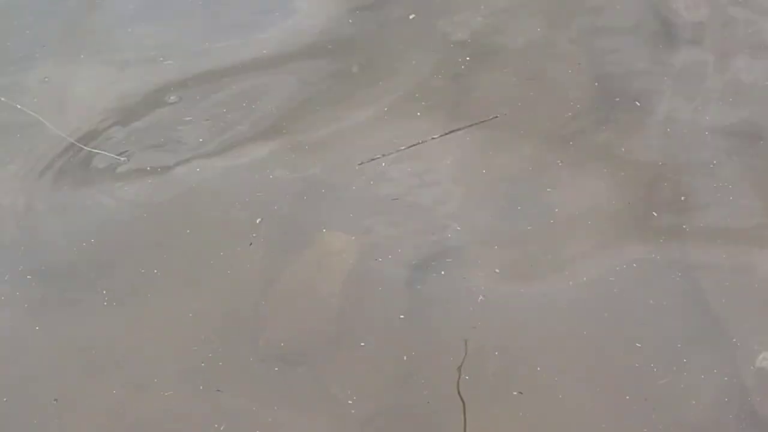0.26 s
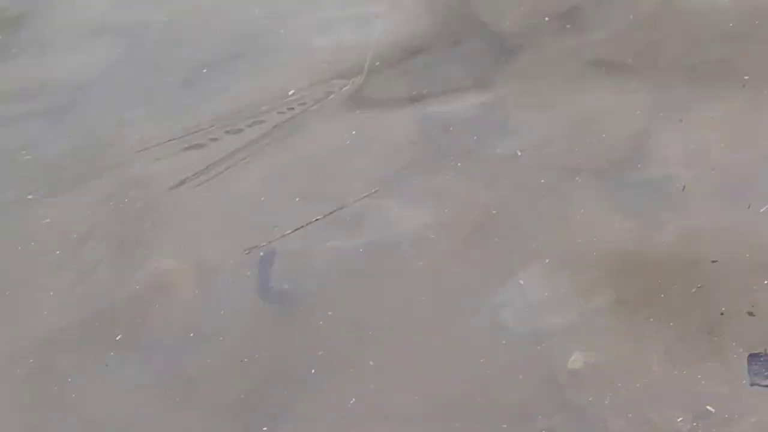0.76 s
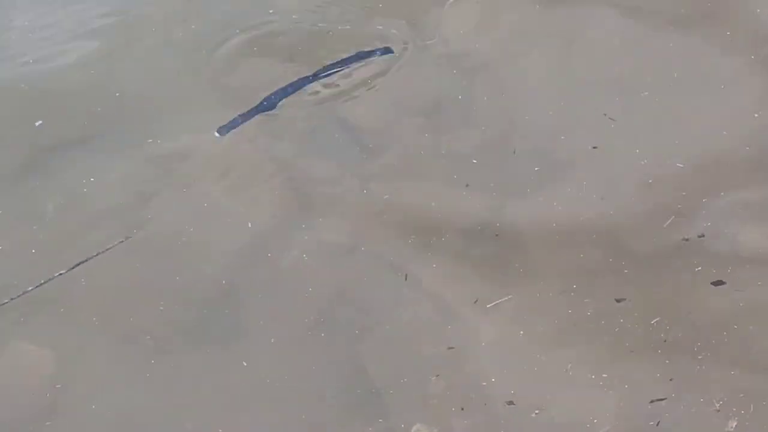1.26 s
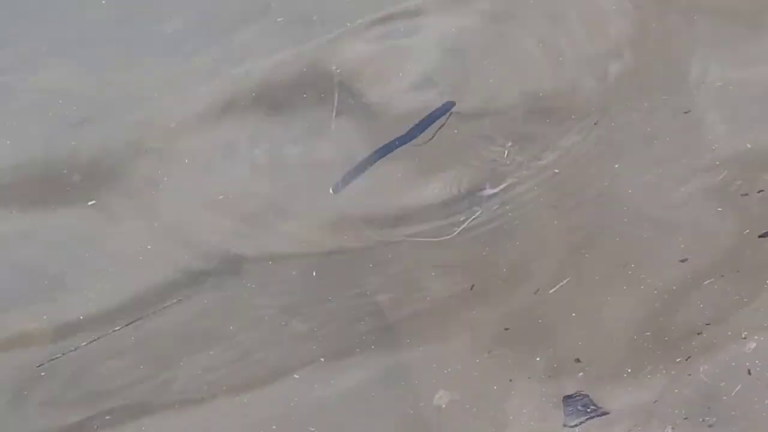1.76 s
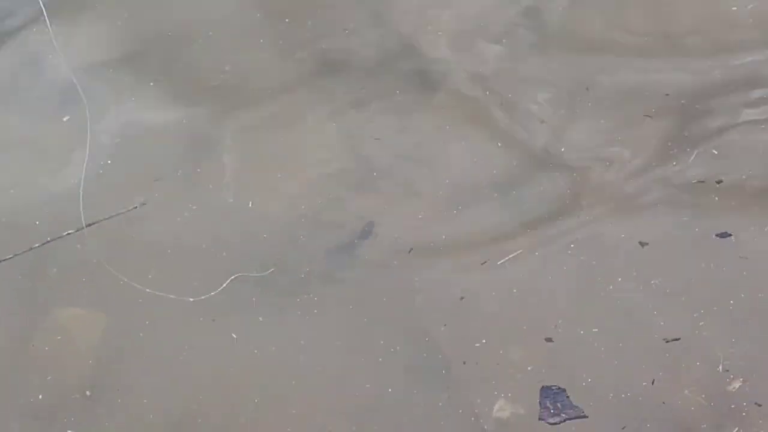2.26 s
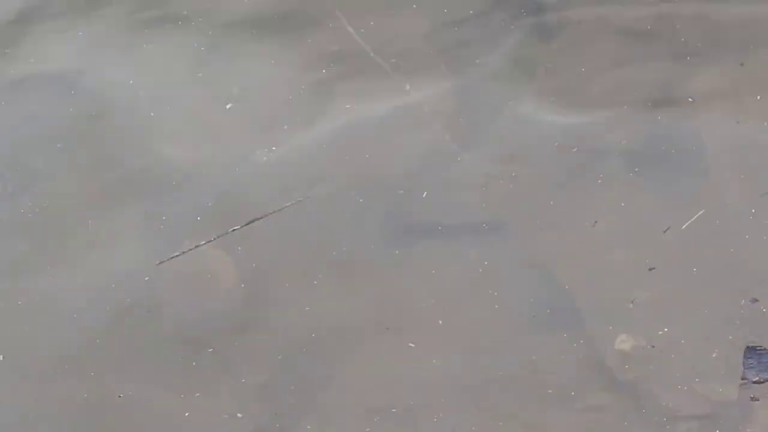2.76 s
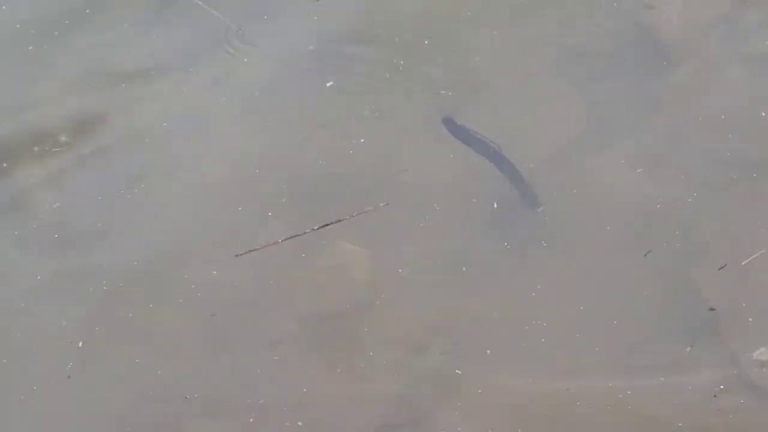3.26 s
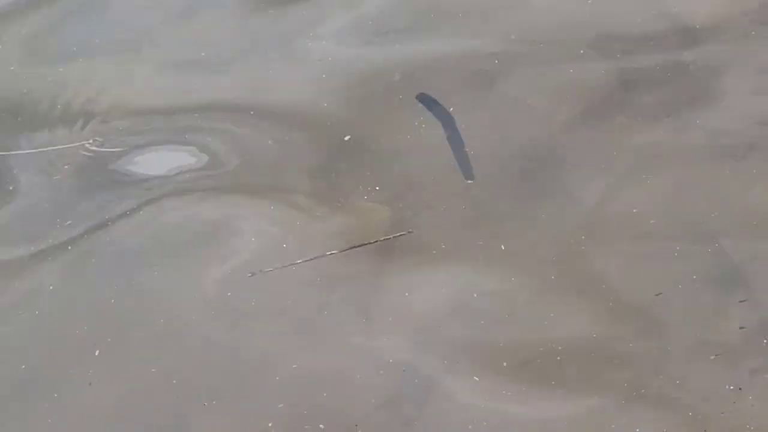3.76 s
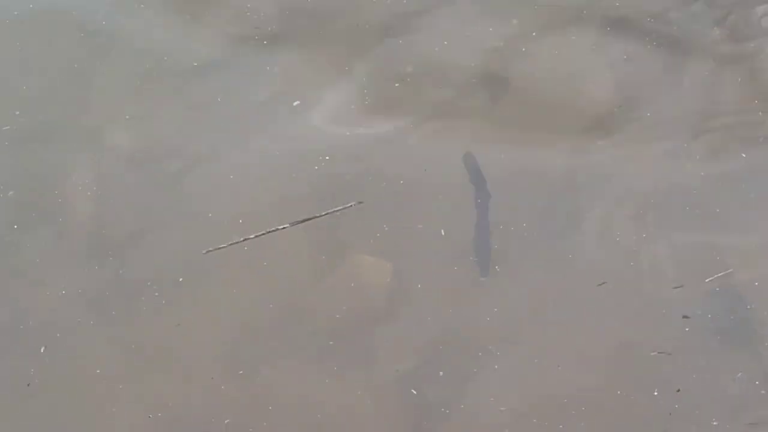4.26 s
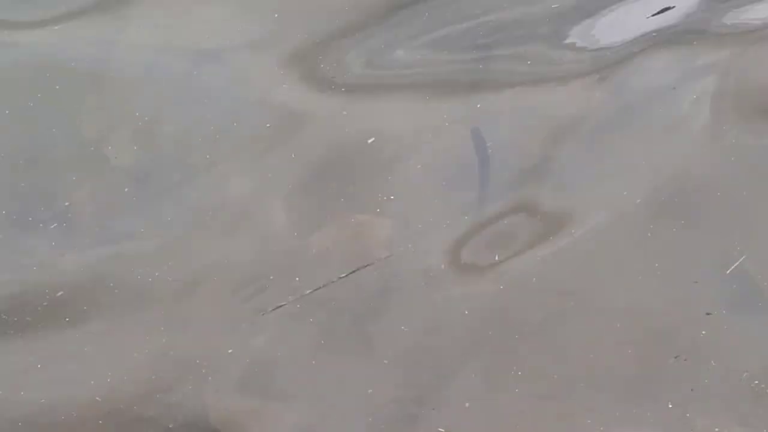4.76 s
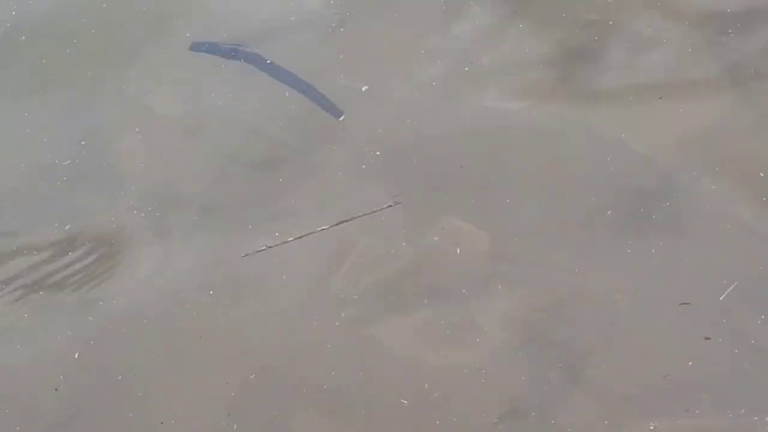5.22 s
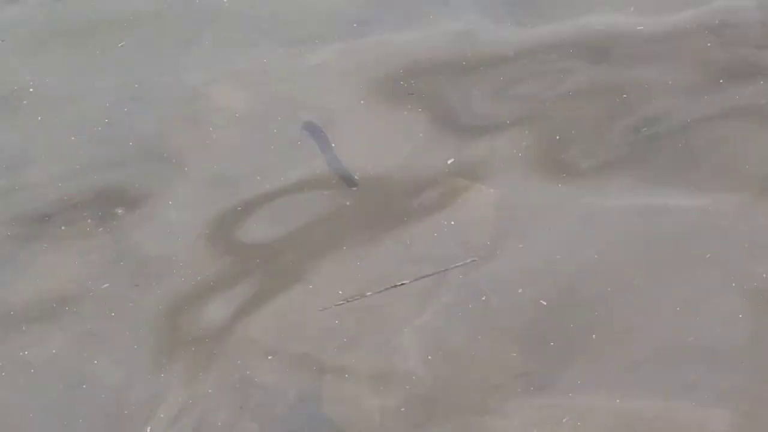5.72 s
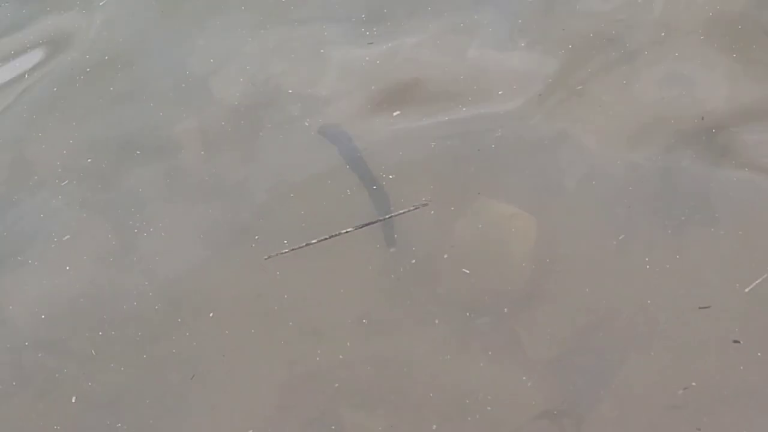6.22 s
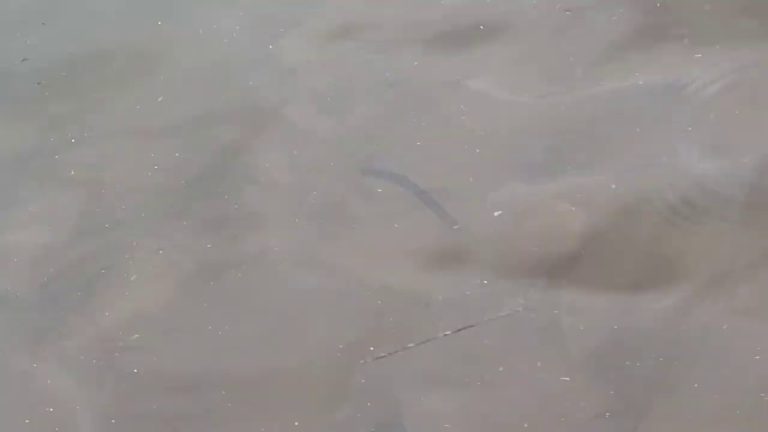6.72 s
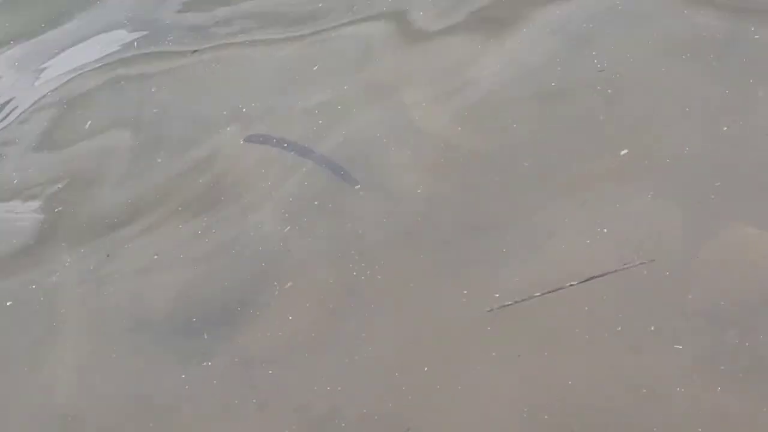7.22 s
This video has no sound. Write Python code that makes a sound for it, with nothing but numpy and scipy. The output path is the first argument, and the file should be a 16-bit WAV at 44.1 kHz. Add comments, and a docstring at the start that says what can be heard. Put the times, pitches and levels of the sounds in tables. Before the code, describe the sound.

Shallow water sloshes, plops and fizzes about once a second while low wind buffets the microphone and a songbird chirps and whistles.

```python
"""From the start small waves lap at a muddy shore, about one a second, as trapped air plops and gurgles
(decaying sines) and spray ticks and fizzes (short rings and noise). Wind bumps two microphone ports: shaped noise
with low thumps. A songbird, a gliding sine with a reverberant tail, chirps in two early phrases, gives five
long whistles from 4.3 s, as the loudest waves follow at 5 to 7 s, and ends in quick chirps from 6.5 s."""
import sys
import numpy as np
from scipy import signal
from scipy.fft import rfft, irfft, next_fast_len
from scipy.io import wavfile
from scipy.ndimage import uniform_filter1d

SR = 44100
rng = np.random.default_rng(int(sys.argv[2]) if len(sys.argv) > 2 else 0)


def transcribe(u):
    """Save the signal u as a 16-bit wav file named by the first command-line argument.

    u: samples, shape (n,) or (channels, n), limited to [-1, 1]; the rate is SR.
    q: integer samples, one column per channel.
    """
    v = np.clip(np.atleast_2d(u).T, -1, 1)
    q = np.round(v * 32767).astype(np.int16)
    wavfile.write(sys.argv[1], SR, q)


N = 330044
TIME = np.arange(N) / SR

# waves breaking on the shore: (time [s], breaking time [s], slosh level [dB], spray level [dB]), before source trims
BREAKING_WAVES = [(0.0, 0.11, -46.5, -54.5), (1.06, 0.1, -44.5, -48), (1.984, 0.16, -48.5, -52.5),
                  (3.009, 0.071, -45.5, -50), (3.958, 0.18, -51.5, -56.5), (4.952, .2, -36.5, -46),
                  (5.838, 0.23, -37.5, -43), (6.932, 0.21, -40.5, -51.5)]
BREAK_DB_PER_S, DRAIN_DB_PER_S = 209, 113  # a break builds up and drains away
SWELL_DB, GATHER_DB_PER_S, SETTLE_DB_PER_S = -15, 62, 23.5  # the quieter swell around each break
# small laps between the waves: (time [s], length [s], level [dB]), before source trims
SMALL_LAPS = [(0.613, 0.34, -53), (1.265, 0.099, -53), (1.874, .011, -51.5), (2.226, 0.081, -52.5),
              (2.659, .25, -58), (3.15, 0.18, -53.5), (3.69, 0.018, -61), (4.213, .072, -55),
              (5.505, 0.31, -50), (6.365, 0.029, -55.5), (6.553, 0.17, -55.5), (6.793, .061, -46.5)]
LAP_RISE_DB_PER_S, LAP_FALL_DB_PER_S, LAP_SPRAY_DB = 241, 70, -7.5  # laps throw little spray
CALM_SLOSH_DB, CALM_SPRAY_DB = -73, -74  # floor between waves, before source trims
# air pockets closed by a wave: (time [s], level before trim [dB], starting pitch [Hz])
AIR_PLOPS = [(0.1, -38, 680), (0.6395, -32, 985), (0.8845, -30.5, 1800), (0.9261, -19.5, 2450),
             (.986, -36, 965), (1.0496, -29.5, 1075), (1.094, -30, 780), (1.107, -31, 850),
             (1.163, -35, 430), (1.2184, -35, 1560), (1.46, -29, 926), (1.988, -34, 580),
             (2.317, -36.5, 730), (3.063, -26.5, 710), (4.927, -43, 540), (4.94, -16.5, 864),
             (5.0418, -29, 1190), (5.077, -18, 1430), (5.1017, -24, 870), (5.126, -25, 500),
             (5.1403, -25, 600), (5.2012, -24, 1870), (5.5098, -30.5, 900), (5.8237, -25, 1010),
             (5.8547, -11, 1540), (5.9002, -14, 710), (5.961, -18, 1090), (6.0056, -24, 238),
             (6.0083, -16, 1790), (6.553, -36.5, 454), (6.802, -27.5, 1230), (6.8675, -33, 640),
             (6.9228, -21.5, 644), (6.941, -12.5, 1020), (7.0103, -32, 660), (7.092, -34, 600)]
PLOP_CYCLES, PLOP_USUAL_DB, PLOP_HALVING_DB = 12, -29, 10.5  # cycles to -60 dB halve per 10.5 dB louder
# droplets and bursting beads: (time [s], level before trim [dB], starting pitch [Hz])
DROPLET_TICKS = [(.0847, -38, 9300), (0.0987, -27.5, 5100), (0.607, -36, 11400), (.641, -39.5, 5600),
                 (0.739, -32.5, 6600), (1.05, -34.5, 4600), (1.182, -35.5, 5800), (2.0162, -35, 6460),
                 (2.4104, -40, 3250), (3.0175, -38, 2900), (3.032, -39.5, 2550), (3.061, -37, 3870),
                 (3.0978, -31, 13100), (3.165, -38, 2650), (3.2678, -37.5, 6860), (4.162, -33, 5320),
                 (4.886, -30.5, 8330), (4.94, -26, 9200), (5.0773, -25, 4400), (5.1423, -24.5, 5300),
                 (5.8542, -26.5, 4650), (5.869, -24.5, 8300), (5.9825, -22, 8760), (6.009, -22.5, 5240),
                 (6.0133, -29, 5530), (6.1266, -26, 14000), (7.0115, -35.5, 4300), (7.0495, -35.5, 4860)]
TICK_CYCLES = 78  # cycles to -60 dB, so a higher tick is shorter
# longer gliding bubble tones: (time [s], starting level [dB], first pitch [Hz], last pitch [Hz], length [s])
BUBBLE_GLIDES = [(0.872, -39, 960, 1550, 0.022), (2.012, -44.5, 464, 590, .036),
                 (2.467, -49.5, 653, 765, .029), (2.666, -46.5, 691, 760, 0.048),
                 (4.302, -41, 376, 514, 0.024), (4.808, -49, 767, 1026, 0.054),
                 (4.926, -31, 426, 473, 0.037), (4.973, -27, 285, 650, .036),
                 (5.0237, -23, 1580, 1700, 0.0088), (5.442, -42, 418, 434, 0.039),
                 (5.519, -42.5, 600, 1050, 0.042), (5.525, -45, 388, 444, .1),
                 (5.768, -33.5, 940, 1030, .018), (5.94, -29, 910, 956, .013), (6.13, -41, 386, 482, 0.11),
                 (6.393, -43.5, 653, 588, 0.056), (6.438, -56.5, 625, 1090, 0.045),
                 (6.629, -39, 384, 424, 0.035), (7.317, -51, 510, 880, 0.025)]
# spectrum of the slosh: (frequency [Hz], relative level per Hz [dB])
SLOSH_SPECTRUM = [(120, -44), (250, -6.5), (420, -6), (800, -3.5), (1300, -2.5), (2000, -2), (3000, -11),
                  (5000, -16.5), (9000, -41)]
# spectrum of the spray: (frequency [Hz], relative level per Hz [dB])
SPRAY_SPECTRUM = [(800, -1), (2000, -3.5), (3500, -5), (5300, -1.5), (6600, -5), (8300, -4.5),
                  (10000, -7.5), (12400, -3.5), (14000, -8.5), (16000, -18)]
# likeness of the sound at the two ports: (frequency [Hz], coherence [-1 to 1])
PORT_COHERENCE = [(100, .5), (300, .85), (700, .75), (1250, -.1), (2500, 0), (16000, 0)]
# gusts that bump the microphone: (peak time [s], half length to 1/e of the gain [s], level before trim [dB])
WIND_GUSTS = [(.02, 0.15, -44), (0.421, 0.014, -38.5), (0.73, 0.085, -40.5), (0.928, 0.019, -42),
              (1.375, 0.084, -44.5), (2.185, 0.1, -46), (2.756, 0.082, -43), (2.99, 0.033, -46),
              (3.176, 0.046, -37.5), (3.388, 0.091, -41), (3.711, 0.035, -34), (4.054, 0.067, -37),
              (4.27, 0.056, -42), (4.514, 0.028, -33), (5.277, 0.067, -46), (6.04, .034, -37),
              (6.162, 0.043, -38), (6.808, 0.049, -37.5), (7.202, 0.073, -40.5)]
# the breeze between gusts: (time [s], level before trim [dB])
BREEZE_LEVEL = [(0, -58), (.28, -61), (1.03, -45.5), (1.18, -75.5), (1.44, -52), (1.61, -58.5), (1.87, -49),
                (2.35, -66.5), (3.37, -53), (4.6, -40), (4.84, -67.5), (5.01, -46), (5.35, -55),
                (6.0, -45.5), (6.5, -63.5), (6.76, -48), (7.48, -55)]
# eddies that hit a port: (time [s], level before trim [dB], starting pitch [Hz])
PORT_EDDIES = [(.008, -26.5, 65), (1.868, -28.5, 95), (2.993, -29.5, 62.5), (3.177, -28, 78.5),
               (3.722, -29, 80), (4.09, -26.5, 74), (4.306, -30.5, 62.3), (4.497, -35, 94.4),
               (4.537, -37.5, 69.4), (5.251, -34, 59.6), (6.818, -29.5, 69.5)]
# spectrum of the wind turbulence: (frequency [Hz], relative level per Hz [dB])
WIND_SPECTRUM = [(15, -17), (35, -10), (62, -2), (100, -8), (160, -16.5), (250, -25), (450, -33.5),
                 (1000, -132), (3000, -100)]
# the bird's syllables by name: (share of the note [0 to 1], pitch before the song's factor [Hz], relative level [dB])
BIRD_SYLLABLES = { "rise": [(0, 3106, 11.5), (.5, 3610, 9), (1, 3740, 2)], "dip": [(0, 2400, -3),
                  (.35, 2340, -13), (1, 1530, -13)], "tew": [(0, 4820, -18), (.2, 4030, -13),
                  (.38, 3250, 4), (.6, 2943, 3), (.85, 2896, -0.5), (1, 3100, -14)], "low": [(0, 1736, -22),
                  (.3, 2003, -5.5), (.5, 2036, -3), (1, 2006, -6)], "chip": [(0, 4280, -3.5),
                  (.2, 3340, -5), (.45, 2510, 4.5), (.7, 2356, -0.5), (1, 2145, -14.5)],
                  "whistle": [(0, 2764, -19), (.17, 2622, 2), (.4, 2638, 6.5), (.7, 2576, 10.5),
                  (.9, 2552, 10), (1, 2444, -7.5)], "slur": [(0, 3857, -19), (.2, 3797, -1),
                  (.4, 3765, -23), (.6, 3420, -10.5), (.8, 2720, -8), (1, 2503, 7.5)],
                  "up": [(0, 1888, -13), (.45, 2350, -1), (.75, 2580, 2.5), (1, 2630, -3.5)]}
# the song, note by note: (time [s], length [s], level before syllable shape [dB], pitch factor, syllable name)
BIRD_SONG = [(0.358, 0.11, -67, 1.014, "rise"), (0.578, 0.057, -45.5, 1.04, "dip"),
             (0.721, 0.097, -45, 1.01, "tew"), (1.393, 0.055, -44, .99, "low"),
             (1.497, 0.063, -41, 0.98, "chip"), (1.591, 0.052, -40.5, 1.008, "low"),
             (1.71, 0.061, -38.5, 1, "chip"), (1.807, 0.046, -41.5, 1.01, "low"),
             (4.332, .18, -57.5, .99, "whistle"), (4.762, .214, -49.5, 1.007, "whistle"),
             (5.228, .21, -46.5, 1, "whistle"), (5.625, .24, -47, 1.006, "whistle"),
             (6.071, 0.23, -46, .988, "whistle"), (6.46, 0.056, -35.5, 1.006, "slur"),
             (6.597, 0.064, -35, 1.003, "slur"), (6.759, 0.062, -35, 1.013, "slur"),
             (6.882, 0.034, -45, .97, "low"), (6.916, 0.045, -40, 1.01, "up"),
             (7.061, 0.054, -41, 0.98, "up")]
# spectrum of the faint open-air background: (frequency [Hz], relative level per Hz [dB])
AIR_SPECTRUM = [(100, 2), (400, -11), (1000, -9.5), (3000, -11), (8000, -16.5), (13000, -16.5),
                (16000, -15)]
AIR_DB = -67
EDGE_HZ = 16400  # upper limit of the recorder's band


def gain_of(db):
    """An amplitude ratio is 10 to the power of decibels over 20."""
    return 10 ** (np.asarray(db) / 20)


def evened(x):
    """Division by the root mean square normalizes the power to 1."""
    return x / np.sqrt(np.mean(x ** 2) + 1e-20)


def read(points, hz):
    """A curve over frequency is interpolated on a logarithmic axis, as pitch is heard."""
    f, value = np.transpose(points)
    return np.interp(np.log(hz + 1), np.log(f), value)


def add(mix, s, sound):
    """By superposition, a sound starting at s seconds adds to the mix."""
    part = mix[:, max(round(s * SR), 0):][:, :sound.shape[-1]]
    part += sound[..., :part.shape[1]]


def colour(x, spectrum):
    """Linear filtering multiplies the spectrum of x by a given curve; the result has rms 1."""
    size = next_fast_len(N, True)
    weight = gain_of(read(spectrum, np.fft.rfftfreq(size, 1 / SR)))
    return evened(irfft(rfft(x, size) * weight, size)[..., :N])


def wander(hz):
    """Interpolated random values form a slow fluctuation of rms 1, up to about hz."""
    return evened(np.interp(TIME * 2 * hz, np.arange(SR), rng.standard_normal(SR)))


def ports(pair):
    """Cross-mixing two unrelated signals by an angle gives a coherence of sin(2 angle) between ports."""
    coherence = read(PORT_COHERENCE, np.fft.rfftfreq(N, 1 / SR))
    angle = np.arcsin(np.clip(coherence, -1, 1)) / 2
    z = rfft(pair)
    return irfft(z * np.cos(angle) + z[::-1] * np.sin(angle), N)


def together(levels_db):
    """The powers of unrelated sounds add; this is the joint gain."""
    return np.sqrt(sum(gain_of(np.maximum(db, -120)) ** 2 for db in levels_db))


def bubble(hz, t60, rise, lag=0):
    """A pocket of air is a damped resonator whose pitch climbs as it nears the surface."""
    t = np.maximum(np.arange(int(t60 * SR) + 64) / SR - lag, 0)
    tone = np.sin(2 * np.pi * hz * t * (1 + rise * t / t60 / 2))
    decay = np.exp(-np.log(1000) * t / t60)  # 60 dB down after t60
    onset = 1 - np.exp(-4 * hz * t)
    return tone * decay * onset


def swarm(per_s, low_hz, high_hz, cycles, rise, spread_db, count=32):
    """Independent random bubbles of many sizes superpose, separately for each port."""
    out = np.zeros((2, N))
    events = int(per_s * N / SR / count) + 1  # for each pitch
    for hz in np.geomspace(low_hz, min(high_hz, 15000), count):
        for side in out:
            t60 = cycles * rng.uniform(.6, 1.9) / hz
            ring = bubble(hz * rng.uniform(1.0, 1.04), t60, rise * rng.random())
            ring /= np.linalg.norm(ring)
            when, chance = rng.random((2, events))
            starts = (when * (N - len(ring))).astype(int)
            sizes = gain_of(-spread_db * np.log(chance + 0.0088))
            for start, size in zip(starts, sizes):
                side[start:start + len(ring)] += size * ring
    return out


def splash(hz, t60, rise, scatter, lag):
    """A bubble's resonance joins a decaying noise slap around its pitch; lag [s] is the delay between ports."""
    ring = np.array([bubble(hz, t60, rise, max(side * lag, 0)) for side in (-1, 1)])
    t = np.arange(ring.shape[1]) / SR
    band = signal.butter(2, [hz / 2, min(hz * 2, .45 * SR)], "band", fs=SR)
    slap = rng.standard_normal(ring.shape) * np.exp(-np.log(1000) * t / t60)
    return ring + scatter * ring.std() * evened(signal.lfilter(*band, slap))


def surge(s, hold, rise, fall):
    """Exponential growth and decay are straight slopes [dB/s]: up to 0 dB at s, a hold, then down."""
    return -rise * np.maximum(s - TIME, 0) - fall * np.maximum(TIME - s - hold, 0)


def lapping():
    """Wave energy swells, breaks and drains, with small laps between: gains of slosh and spray."""
    slosh_db, spray_db = [CALM_SLOSH_DB], [CALM_SPRAY_DB]
    for s, hold, body_db, bead_db in BREAKING_WAVES:
        crest = surge(s, hold, BREAK_DB_PER_S, DRAIN_DB_PER_S)
        swell = surge(s, hold, GATHER_DB_PER_S, SETTLE_DB_PER_S) + SWELL_DB
        slosh_db += [body_db + crest, body_db + swell]
        spray_db += [bead_db + crest, bead_db + swell]
    for s, hold, db in SMALL_LAPS:
        lap = db + surge(s, hold, LAP_RISE_DB_PER_S, LAP_FALL_DB_PER_S)
        slosh_db.append(lap)
        spray_db.append(lap + LAP_SPRAY_DB)
    return together(slosh_db), together(spray_db)


def slosh(motion, level_db=-4):
    """Entrained air resonates: short bubbles and fewer long rising ones over a lumpy noise churn."""
    bubbles = swarm(per_s=230, low_hz=220, high_hz=3600, cycles=16, rise=.35, spread_db=4.5)
    glides = swarm(per_s=28, low_hz=350, high_hz=1200, cycles=65, rise=.8, spread_db=3)
    churn = rng.standard_normal((2, N)) * gain_of(6 * wander(hz=80))
    water = colour(bubbles, SLOSH_SPECTRUM)
    water += .5 * colour(glides, SLOSH_SPECTRUM)
    water += .36 * colour(churn, SLOSH_SPECTRUM)
    return ports(water) * motion * gain_of(level_db)


def drops(plop_db=2, tick_db=1):
    """Damping per cycle sets the ring: plops decay in fewer cycles when louder, ticks in a fixed number."""
    out = np.zeros((2, N))
    port_lag = .00016  # s
    for s, db, hz in AIR_PLOPS:
        cycles = PLOP_CYCLES * 2 ** ((PLOP_USUAL_DB - db) / PLOP_HALVING_DB)
        plop = splash(hz, cycles / hz, rise=0.14, scatter=0.4, lag=port_lag * rng.uniform(-1.6, 1))
        add(out, s, gain_of(db + plop_db) * plop)
    for s, db, hz in DROPLET_TICKS:
        tick = splash(hz, TICK_CYCLES / hz, rise=0.039, scatter=0.7, lag=rng.uniform(-0.41, 0.41) / hz)
        add(out, s, gain_of(db + tick_db) * tick)
    return out


def gurgles(fade_db=11, flutter=0.58):
    """Bubble resonances glide, nearly all upward, as the water drains back; they flutter and fade."""
    out, unrest = np.zeros((2, N)), wander(hz=114.5)
    for s, db, first_hz, last_hz, length in BUBBLE_GLIDES:
        u = np.linspace(0, 1, int(length * SR))
        shake = 1 + flutter * unrest[int(s * SR):][:len(u)]
        hz = first_hz * (last_hz / first_hz) ** u
        tone = np.sin(2 * np.pi * np.cumsum(hz) / SR)
        add(out, s, gain_of(db - fade_db * u) * shake * tone * signal.windows.tukey(len(u), .2))
    return out


def spray(motion, snaps_db=-2, rings_db=-7.5, fizz_db=-5):
    """Bursting beads are impulsive sources: noise snaps and small resonances over a flickering fizz."""
    per_s, spread_db, burst_s, flicker_db = 140, 5, .001, 4
    sizes = gain_of(spread_db * np.minimum(rng.exponential(1, N), 3.5))
    impulses = sizes * (rng.random(N) < per_s / SR)
    bursts = signal.lfilter([1], [1, -np.exp(-1 / (burst_s * SR))], impulses)  # exponential decays
    snaps = colour(bursts * rng.standard_normal((2, N)), SPRAY_SPECTRUM)
    beads = swarm(per_s=170, low_hz=1800, high_hz=14500, cycles=18, rise=.1, spread_db=4.5)
    rings = colour(beads, SPRAY_SPECTRUM)
    flicker = gain_of(flicker_db * wander(hz=62.35))
    fizz = colour(rng.standard_normal((2, N)) * flicker, SPRAY_SPECTRUM)
    return (gain_of(snaps_db) * snaps + gain_of(rings_db) * rings + gain_of(fizz_db) * fizz) * motion


def blowing():
    """Powers of independent flows add: bell-shaped gusts ride on a slow breeze."""
    breeze = np.interp(TIME, *np.transpose(BREEZE_LEVEL))
    gusts = [db - 20 / np.log(10) * ((TIME - s) / half) ** 2 for s, half, db in WIND_GUSTS]
    return together([breeze] + gusts)


def wind(buffet_db=1, puff_db=-9, puff_hz=190, puff_t60=0.034, left_db=2, right_db=-2):
    """Turbulent pressure is unrelated at each port, a lumpy rumble; single eddies thump and puff."""
    lumps = gain_of(4.5 * np.array([wander(hz=30) for port in range(2)]))
    out = colour(rng.standard_normal((2, N)) * lumps, WIND_SPECTRUM) * blowing()
    for s, db, hz in PORT_EDDIES:
        thump = np.array([bubble(hz, t60=5.5 / hz, rise=0.28, lag=rng.uniform(0, 0.54) / hz)
                          for port in range(2)])
        add(out, s, gain_of(db + buffet_db) * thump)
        add(out, s, gain_of(db + puff_db) * splash(puff_hz, puff_t60, rise=0, scatter=1.27, lag=0))
    return out * gain_of([[left_db], [right_db]])


def bird(waver=0.0055, tremble_db=0.5):
    """A whistle is nearly a pure tone: its phase integrates each syllable's gliding frequency."""
    out, unrest = np.zeros((1, N)), wander(hz=91.2)
    for s, length, db, pitch, name in BIRD_SONG:
        share, hz, shape_db = np.transpose(BIRD_SYLLABLES[name])
        u = np.linspace(0, 1, int(length * SR))
        shake = unrest[int(s * SR):][:len(u)]
        smooth_hz = uniform_filter1d(np.interp(u, share, hz), size=300, mode="nearest")
        glide = smooth_hz * pitch * (1 + waver * shake)
        loud = gain_of(db + np.interp(u, share, shape_db) + tremble_db * shake)
        tone = np.sin(2 * np.pi * np.cumsum(glide) / SR)
        add(out, s, loud * tone * signal.windows.tukey(len(u), 0.0056 / length))
    return out


def trees(x, near_db=-1, far_db=-17.5):
    """Scattering is convolution: twigs return high notes early, the trees a faint long tail."""
    t = np.arange(SR) / SR
    near_t60, twig_hz, far_t60 = .18, 3200, 1.3
    near = rng.standard_normal((1, SR)) * (t > .003) * np.exp(-np.log(1000) * t / near_t60)
    near = signal.lfilter(*signal.butter(4, twig_hz, "high", fs=SR), evened(near))
    far = evened(rng.standard_normal((2, SR)) * (t > .02) * np.exp(-np.log(1000) * t / far_t60))
    echo = (gain_of(near_db) * near + gain_of(far_db) * far) / np.sqrt(SR)
    return x + signal.fftconvolve(x, echo, axes=1)[:, :N]


def open_air():
    """Steady diffuse noise, partly coherent between the ports, forms the background."""
    return gain_of(AIR_DB) * ports(colour(rng.standard_normal((2, N)), AIR_SPECTRUM))


def scene():
    """Level differences place sources: slosh, plops and gurgles a little right, the direct bird ahead."""
    slosh_gain, spray_gain = lapping()
    water = slosh(slosh_gain) + gurgles() + drops()
    water = water * gain_of([[-.7], [.7]]) + spray(spray_gain)
    return water + wind() + trees(bird()) + open_air()


def record(dry):
    """A linear-phase low-pass filter is the recorder's band limit."""
    low_pass = signal.firwin(511, EDGE_HZ, window=("kaiser", 9), fs=SR)
    return signal.oaconvolve(dry, low_pass[None], "same")


dry = scene()
out = record(dry)
transcribe(out)
```